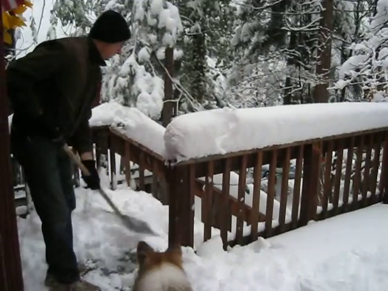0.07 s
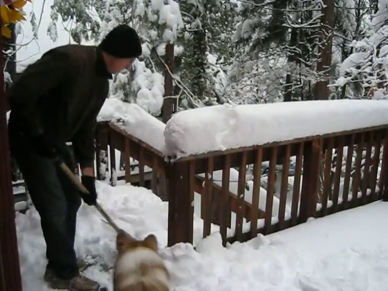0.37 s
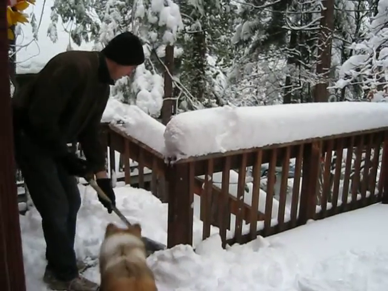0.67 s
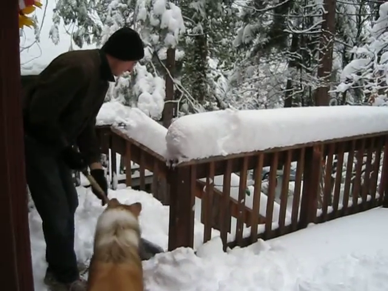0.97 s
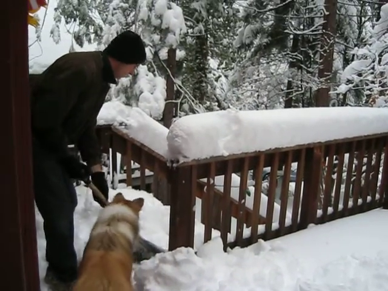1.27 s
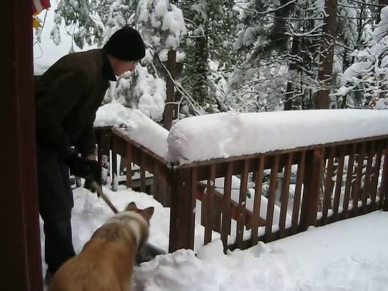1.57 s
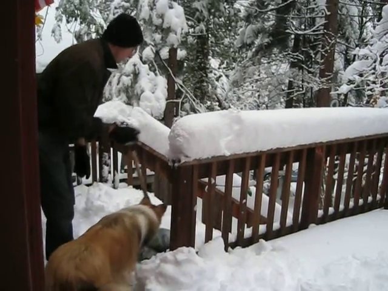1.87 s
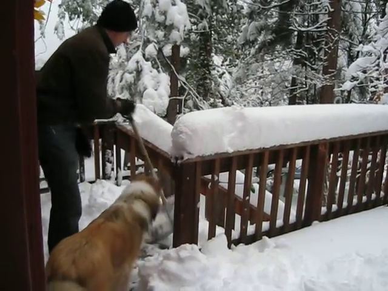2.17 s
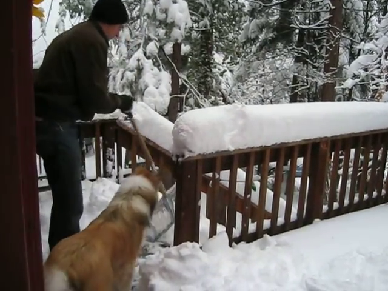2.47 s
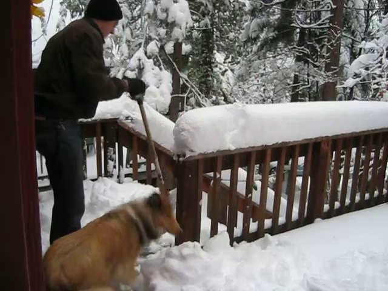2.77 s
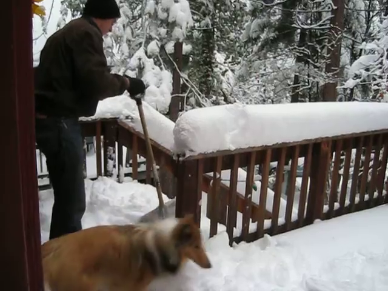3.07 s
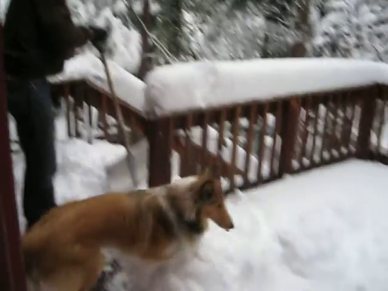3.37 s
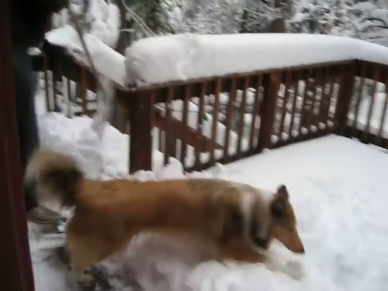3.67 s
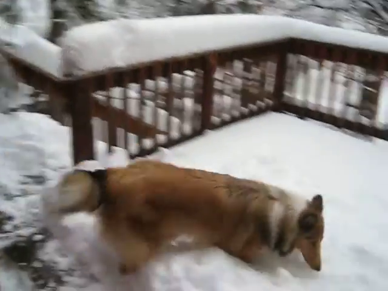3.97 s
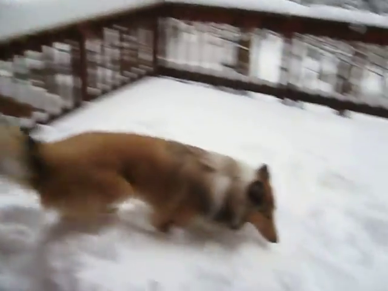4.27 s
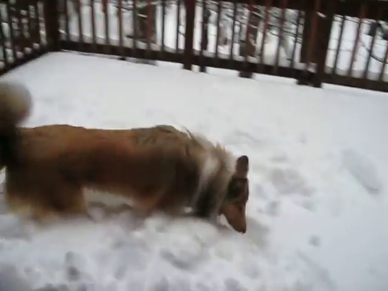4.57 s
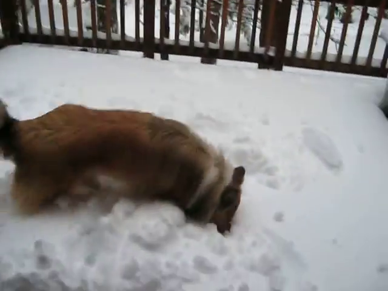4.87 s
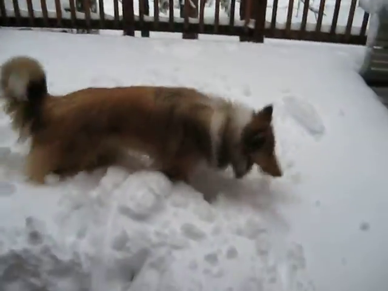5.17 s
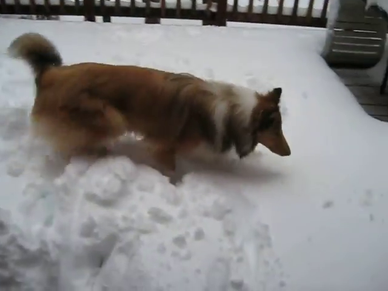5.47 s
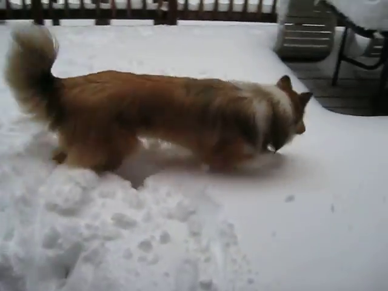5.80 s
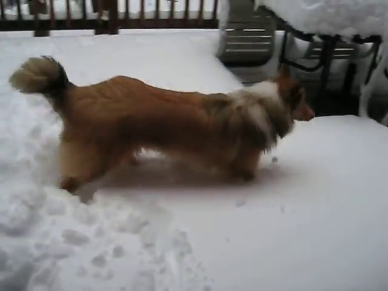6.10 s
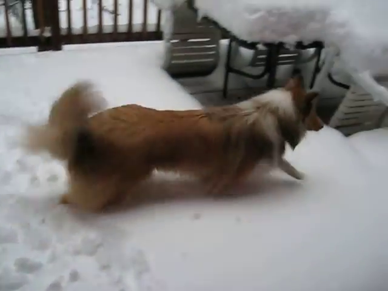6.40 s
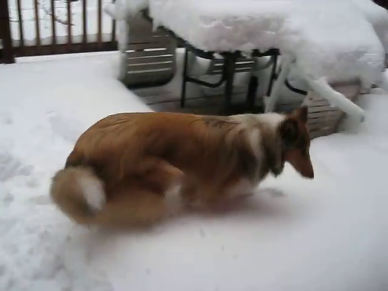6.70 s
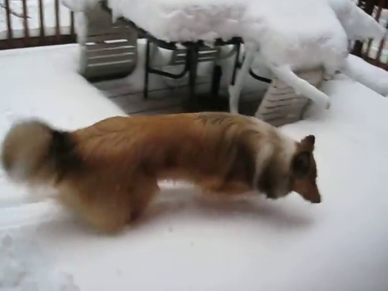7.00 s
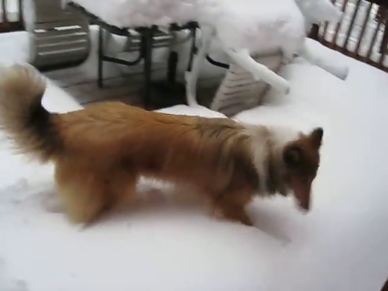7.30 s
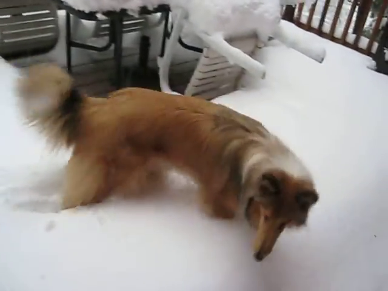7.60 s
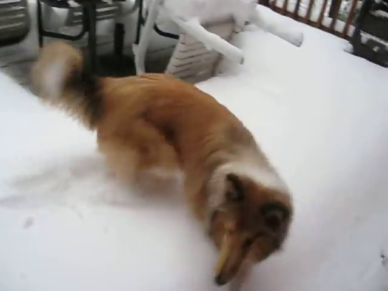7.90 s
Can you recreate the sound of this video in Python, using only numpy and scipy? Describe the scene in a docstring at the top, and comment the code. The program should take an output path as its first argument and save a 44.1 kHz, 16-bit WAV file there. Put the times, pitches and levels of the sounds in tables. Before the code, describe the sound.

Outdoors, over the faint hiss of a small microphone, a shovel swishes and rasps softly through snow, with little ticks and dull puffs as it packs. Two loud, sharp knocks of the blade on a wooden deck stand out, a brief scrape between them. Toward the end a dog wades through the snow with light crunches, and a few smaller knocks follow close together.

```python
"""A shovel bites and swishes through snow on a wooden deck outdoors. Stick-slip friction makes
its blade sing and rasp; crumbs of crust snap, and later its blows set the boards booming.
The snow crunches as its crystals fracture, and thuds dully where it is packed. In the second
half a dog wades about. A small camera microphone hears it all over a quiet, even hiss."""
import sys
import numpy as np
from scipy import signal
from scipy.fft import rfft, irfft, next_fast_len
from scipy.io import wavfile
from scipy.ndimage import map_coordinates

SR = 44100
rng = np.random.default_rng(int(sys.argv[2]) if len(sys.argv) > 2 else 0)


def dump_mix(stems):
    """Bounce the given channels to the path in sys.argv[1] as a 16-bit WAV at rate SR."""
    frames = np.atleast_2d(stems).T  # one column per channel
    limited = np.clip(frames, -1, 1)  # hard clip at full scale
    pcm = np.round(limited * 32767).astype(np.int16)
    wavfile.write(sys.argv[1], SR, pcm)


N = 354872


def amp(db):
    """Amplitude grows tenfold with every 20 decibels."""
    return 10 ** (np.asarray(db) / 20)


def unit(x):
    """Normalisation to rms 1."""
    return x / np.sqrt(np.mean(x ** 2) + 1e-20)


def along(points, hz):
    """Interpolation of (Hz, value) points on a logarithmic frequency axis."""
    f, v = np.transpose(points)
    return np.interp(np.log(hz + 1), np.log(f), v)


def filtered(x, response):
    """Linear filtering: the spectrum of x is multiplied by a frequency response."""
    size = next_fast_len(len(x) + 8192)
    return irfft(rfft(x, size) * response(np.fft.rfftfreq(size, 1 / SR)), size)[:len(x)]


def coloured(x, spectrum):
    """Spectral shaping by (Hz, relative dB) points; rms 1."""
    return unit(filtered(x, lambda hz: amp(along(spectrum, hz))))


def resonance(hz, centre_hz, q):
    """Causal band-pass response of a damped oscillator."""
    damping = 1j * hz * centre_hz / q
    return damping / (centre_hz ** 2 - hz ** 2 + damping)


def wobble(rate):
    """Smooth random modulation through rate knots a second."""
    return map_coordinates(rng.standard_normal(int(N * rate / SR) + 4), [np.arange(N) * rate / SR])


def add(track, start, sound):
    """Superposition: a sound joins the track at start seconds."""
    part = track[max(round(start * SR), 0):][:len(sound)]
    part += sound[:len(part)]


def swell(peak, rise, fall):
    """Envelope of a force that builds to a peak and lets go."""
    t = np.arange(N) / SR - peak
    return np.exp(-np.abs(t / np.where(t < 0, rise, fall)) ** 1.5)  # power 1 is pointed, 2 rounded


def friction(size, centre_hz, width_hz):
    """Stick-slip friction: random excitation heard through one resonance; rms 1."""
    noise = rng.standard_normal(size)
    return unit(filtered(noise, lambda hz: resonance(hz, centre_hz, centre_hz / width_hz) ** 2))


def contact(t, pitch_hz):
    """Impact transient: a hard touch swells and dies in about two cycles."""
    age = t * pitch_hz / .9
    return np.sin(2 * np.pi * pitch_hz * t) * (age * np.exp(1 - age)) ** 3.9


def crunch(spectrum, rate, spread_db, smooth_db, clump_db):
    """Brittle fracture: rate crystals break a second, louder in clumps, over smooth rubbing; rms 1."""
    breaks = (rng.random(N) < rate / SR) * rng.choice([-1, 1], N)
    sizes = amp(spread_db * np.minimum(rng.exponential(size=N), 4))
    grains = unit(breaks * sizes) + amp(smooth_db) * rng.standard_normal(N)
    return coloured(grains * amp(clump_db * wobble(140)), spectrum)


def snow(rub, spray, load):
    """Granular noise follows force: snow rubs, sprays powder with a few coarse crystals, and packs."""
    # Spectra of rubbing, powder and packing. Each row: frequency in Hz, relative level in dB.
    slide_spectrum = [(290, -68), (500, -17), (893, -14.5), (1190, -0.5), (2080, -1.5), (2530, 0.5),
                      (5160, -3.5), (6410, -6), (7880, -11), (9000, -7.5), (11700, -40), (19800, -120)]
    powder_spectrum = [(3000, -22), (6000, 0), (9500, 2), (13500, -1), (16000, -9.5)]
    packing_spectrum = [(30, -16), (80, -2.5), (200, 1.5), (400, 1.5), (680, 3.5), (1200, -1.5),
                        (2200, -6.5), (5000, -57)]
    slide = crunch(slide_spectrum, rate=2500, spread_db=1.5, smooth_db=0.5, clump_db=1.87)
    powder = crunch(powder_spectrum, rate=4000, spread_db=1, smooth_db=-5, clump_db=1.5)
    crystals = crunch(powder_spectrum, rate=100, spread_db=3.5, smooth_db=-30, clump_db=4.0)
    packing = crunch(packing_spectrum, rate=1100, spread_db=2.0, smooth_db=-1.0, clump_db=3.5)
    return rub * slide + spray * (powder + amp(-8) * crystals) + load * packing


def air():
    """Noise floor: still winter air and microphone hiss at a nearly constant level."""
    # Spectrum of the hiss. Each row: frequency in Hz, relative level in dB.
    spectrum = [(12, -39), (20, -3.5), (150, 3), (780, -1), (1910, -5.5), (3070, -8), (6010, -14),
                (7110, -15.5), (7950, -12), (8650, -16), (9950, -15), (14700, -20), (16000, -16)]
    level_db = -53.5 + 0.39 * wobble(3.6)
    return amp(level_db) * coloured(rng.standard_normal(N), spectrum)


def settling():
    """Granular flow: loose snow trickles faintly in uneven spurts."""
    # Course of the trickle. Each row: time in seconds, mean rubbing level in dB.
    trickle = [(0, -59.5), (1.3, -65), (3.2, -64.5), (3.6, -59), (4.9, -59), (6.7, -62), (7.4, -58.5),
               (8.05, -65)]
    times, db = np.transpose(trickle)
    flow = amp(np.interp(np.arange(N) / SR, times, db) + 3 * wobble(19))
    return snow(rub=flow, spray=amp(-6.5) * flow, load=amp(-4.5) * flow)


def squeak():
    """Frequency modulation: a faint, very high whistle wavers, holds and then sags."""
    # Each row: time in seconds, pitch in Hz, level in dB.
    times, hz, db = np.transpose([(5.305, 13400, -90), (5.32, 13400, -59), (5.38, 13550, -59),
                                  (5.415, 12550, -61), (5.445, 12950, -62), (5.47, 12400, -90)])
    t = np.arange(N) / SR
    pitch = np.interp(t, times, hz) * (1 + 0.0064 * wobble(400))
    envelope = amp(np.interp(t, times, db)) * (t > times[0]) * (t < times[-1])
    return envelope * np.sin(2 * np.pi * np.cumsum(pitch) / SR)


def tread():
    """Friction and loading: the dog's legs brush the snow; its weight packs it and shakes the deck."""
    # The dog's steps. Each row: peak time and rise or fall time in seconds, level in dB,
    # powder and weight in relative dB.
    steps = [(5.416, .1, -57, -6, 4), (5.874, 0.16, -55.5, -11, -9), (6.473, 0.14, -56, -8, 1),
             (6.662, 0.098, -55, -5, 2.5), (6.87, 0.11, -63, -1, 11), (7.103, 0.073, -59.5, -16, 14.5),
             (7.169, 0.02, -52.5, -1, 4.5), (7.226, 0.028, -50.5, -9, -2), (7.287, 0.04, -59.5, -23, 15),
             (7.456, .013, -46.5, -17, -9), (7.533, 0.055, -47.5, -11, -6.5), (7.602, 0.035, -50, -9, 0),
             (7.738, 0.018, -49.5, -19, -9), (7.883, 0.055, -52, -5.5, 1), (7.987, 0.059, -52, -4.5, 3.5)]
    # Spectrum of the boards under the dog. Each row: frequency in Hz, relative level in dB.
    rumble_spectrum = [(20, -14), (35, -7), (90, 0), (150, -3), (260, 1.5), (600, -53)]
    rub, spray, load = np.zeros((3, N))
    for peak, ramp, db, powder_db, weight_db in steps:
        force = amp(db) * swell(peak, ramp, ramp)
        rub += force
        spray += amp(powder_db) * force
        load += amp(weight_db) * force
    rumble = amp(-7) * load * coloured(rng.standard_normal(N), rumble_spectrum)
    return snow(rub, spray, load) + rumble


def thuds():
    """Heavy damping: packed snow gives way with a soft puff in one broad resonance. The thuds at 0.414 and
    1.703 s are instead short hollow knocks of the blade, played the same way."""
    # Each row: start in seconds, peak level in dB, pitch in Hz.
    collapses = [(.414, -30.5, 437), (0.678, -37, 443), (1.703, -35.5, 514), (1.969, -39, 402),
                 (3.002, -43, 796), (6.831, -39, 630), (7.177, -38, 689), (7.546, -33.5, 1120),
                 (7.632, -39, 296), (7.836, -33.5, 415), (7.966, -40.5, 177)]
    out, t = np.zeros(N), np.arange(SR // 10) / SR
    for start, db, pitch_hz in collapses:
        puff = filtered(rng.standard_normal(len(t)), lambda hz: resonance(hz, pitch_hz, q=1.3) ** 2)
        puff *= (1 - np.exp(-t / 0.0017)) * amp(-60 * t / 0.045)
        add(out, start, amp(db) * puff / np.abs(puff).max())
    return out


def ticks():
    """Brittle fracture: a hard crumb of crust snaps and throws fine splinters. The snaps at 2.2805 and 7.1368 s
    are instead the sharp clicks that open a bite of the blade and a blow on the boards."""
    # Each row: start in seconds, level in dB, pitch in Hz, splinters in relative dB.
    snaps = [(1.384, -45.5, 4000, 3.5), (1.968, -39.5, 1190, -5), (2.2805, -25, 4200, -10),
             (2.472, -38.5, 800, -12), (3.073, -38, 1530, 0), (3.617, -50, 2500, 7.5),
             (3.724, -45, 2400, 5.5), (3.756, -39, 1200, -4), (4.181, -40.5, 1200, -0.5),
             (4.227, -30, 6000, -11), (4.8215, -27, 3600, -27.5), (6.501, -33.5, 1060, -21),
             (6.881, -36, 760, -21), (7.1368, -28, 2130, -28), (7.605, -31.5, 1490, -16)]
    # Each row: frequency in Hz, relative level in dB.
    splinter_spectrum = [(60, -30), (400, -7), (2000, 8), (5000, 2.5), (12000, -2)]
    out, t = np.zeros(N), np.arange(SR // 20) / SR
    envelope = (1 - np.exp(-t / 0.00017)) * amp(-60 * t / 0.039)
    for start, db, pitch_hz, splinter_db in snaps:
        splinters = coloured(rng.standard_normal(len(t)), splinter_spectrum) * envelope
        add(out, start, amp(db) * (contact(t, pitch_hz) + amp(splinter_db) * splinters))
    return out


def scattering(t, ring_hz, t60):
    """Diffuse reflection from rails and walls: a ringing tail whose treble dies first."""
    # Reverberation of the yard. Each row: frequency in Hz, time to fall 60 dB in seconds.
    yard = [(100, 1), (1000, 1), (3000, 1), (12000, .1)]
    bands, times, spectra = signal.stft(rng.standard_normal(len(t)), SR, nperseg=128)
    decay = amp(-60 * times / along(yard, bands)[:, None])
    diffuse = signal.istft(spectra * decay, SR, nperseg=128)[1][:len(t)]
    tail = filtered(diffuse, lambda hz: resonance(hz, ring_hz, q=7.2) / (1 + (hz / 3200) ** 2))
    return tail / np.std(tail[:SR // 40]) * amp(-60 * t / t60)  # a fade on top of the yard's decay


def boards(t, boom_hz):
    """Modal vibration: where a blow lands decides which modes boom most, here those near boom_hz."""
    # Modes of the deck. Each row: frequency in Hz, relative level in dB, time to fall 60 dB in seconds.
    modes = [(97, 6, 0.12), (122, -5, 0.2), (141, -6.5, 0.25), (190, -1.5, 0.072), (226.3, 1, 0.26),
             (296, -5.5, 0.36), (427, 2.5, 0.13), (506, -24, 0.23), (608, 9, 0.23)]
    boom = np.zeros(len(t))
    for hz, db, t60 in modes:
        octaves_off = abs(np.log2(hz / boom_hz))
        envelope = amp(db - 16.7 * octaves_off - 60 * t / t60)
        boom += envelope * np.sin(2 * np.pi * (hz * t + rng.random()))
    return boom


def knocks():
    """Impact excitation: the blade clacks, rebounds and echoes; the boards boom, the rails scatter."""
    # Blows on the boards. Each row: start in seconds, level in dB, contact and ring pitches in Hz,
    # tail in relative dB, its 60 dB fade in seconds, boom centre in Hz, boom and crack in relative dB.
    blows = [(3.978, -9, 1390, 670, -11, 0.13, 143, -10, -11.5),
             (3.9865, -20, 670, 190, -9, 0.24, 170, -6, -17),
             (4.005, -25, 2170, 700, -3, 0.18, 159, 2, -2.5),
             (4.049, -27.5, 710, 690, 3, 0.081, 140, 5, -6),
             (5.196, -26.5, 830, 573, -8, 0.041, 350, -12, -7.5),
             (5.528, -28, 815, 617, 0.5, 0.11, 110, -5, -18),
             (5.7037, -6.5, 1073, 976, -18.5, 0.29, 386, -14.5, -25.5),
             (5.7112, -28, 364, 643, -1, 0.21, 88.5, 10.5, -22),
             (7.1357, -20, 915, 437, -4, 0.056, 300, -14, -25),
             (7.2247, -24.5, 1100, 725, 6.5, 0.039, 437, -4.5, -15),
             (7.2601, -28, 294, 300, -10, 0.06, 228, -5, -16),
             (7.276, -27.5, 825, 460, -9, 0.14, 260, -8, -6)]
    # Reflections from the house wall and rails. Each row: delay in seconds, gain in dB.
    echoes = [(0.0102, -14.5), (0.0235, -22), (.032, -33)]
    # Each row: frequency in Hz, relative level in dB.
    crack_spectrum = [(60, -35), (250, 8), (700, 8), (2600, 1), (5000, -16.5), (14000, -16.5)]
    rebound_cycles = 1.993  # a harder, higher contact rebounds sooner
    out, t = np.zeros(N), np.arange(SR // 2) / SR
    crack_envelope = (1 - np.exp(-t / 0.00035)) * amp(-60 * t / 0.06)
    body_onset = 1 - np.exp(-(t / 0.0051) ** 2)
    for start, db, contact_hz, ring_hz, tail_db, t60, boom_hz, boom_db, crack_db in blows:
        for delay, gain_db in [(0, 0), (rebound_cycles / contact_hz, -4)] + echoes:
            add(out, start + delay, amp(db + gain_db) * contact(t, contact_hz))
        crack = amp(crack_db) * coloured(rng.standard_normal(len(t)), crack_spectrum) * crack_envelope
        boom = amp(boom_db - 11.5) * boards(t, boom_hz)
        tail = amp(tail_db - 4.5) * scattering(t, ring_hz, t60)
        add(out, start, amp(db) * (crack + (boom + tail) * body_onset))
    return out


def rasps():
    """Stick-slip excitation: the blade catches and one of its resonances sounds for a moment. The low catches
    at 0.567 and 1.177 s are groans of packing snow."""
    # Each row: start and end in seconds, centre and bandwidth in Hz, level in dB.
    catches = [(0.376, 0.452, 6700, 220, -59), (0.485, 0.6, 3280, 700, -43.5),
               (0.567, 0.62, 837, 203.7, -40.5), (1.177, 1.226, 650, 150, -44),
               (3.976, 3.988, 4370, 500, -39), (4.819, 4.827, 2700, 300, -43),
               (5.124, 5.193, 5540, 2160, -37.5), (5.109, 5.177, 2600, 756, -44),
               (6.321, 6.355, 2300, 432, -42.5), (6.36, 6.88, 2420, 216, -62.5),
               (7.49, 7.568, 1270, 509.3, -48)]
    out = np.zeros(N)
    for start, end, centre_hz, width_hz, db in catches:
        size = round((end - start) * SR)
        add(out, start, amp(db) * friction(size, centre_hz, width_hz) * signal.windows.tukey(size, .5))
    return out


def bites():
    """Forced vibration: a stab starts at once, holds while the blade sinks, and rings its edge."""
    # Each row: start in seconds, level in dB, hold in seconds, powder and packing in relative dB.
    stabs = [(0.014, -54.5, 0.02, 6.5, -24), (0.3, -52, 0.013, -4, -5), (0.369, -38, 0.0081, -12, -10.5),
             (0.412, -40, 0.02, -7, -9), (1.121, -46, 0.019, 1, -1.5), (1.378, -53.5, 0.0047, 5, 2.5),
             (2.284, -51.5, 0.015, 0, 2.5), (2.828, -54.5, 0.018, -13, 5.5), (3.281, -50, .016, 4, -13)]
    rub, spray, load = np.zeros((3, N))
    t = np.arange(SR // 4) / SR
    for start, db, hold, powder_db, packing_db in stabs:
        force = amp(db) * (1 - np.exp(-t / .0005)) * np.exp(-np.maximum(t - hold, 0) / .008)
        add(rub, start, force)
        add(spray, start, amp(powder_db) * force)
        add(load, start, amp(packing_db) * force)
    return snow(rub, spray, load) + amp(-1) * rub * friction(N, centre_hz=4380, width_hz=2000)


def pushes_and_steps():
    """Sliding friction: each push makes the blade's modes sing; the load ahead packs and groans. Two rows, at
    4.33 and 4.735 s, are steps of the dog, played the same way."""
    # Each row: peak, rise and fall times in seconds, level in dB, powder and packing in relative dB. The rows
    # at 4.33 and 4.735 s are the dog's steps.
    pushes = [(.092, .028, 0.017, -41.5, 0, -23), (.54, 0.052, .075, -37.5, -10, -10.5),
              (.665, 0.052, 0.044, -46, -11, -2), (.772, 0.021, 0.021, -46, -3, -15),
              (.87, 0.069, 0.084, -53, -7, -16), (1.19, 0.06, .035, -43.5, -7, -4),
              (1.465, 0.053, 0.039, -52, -7, -7), (1.53, 0.026, 0.043, -50.5, -3.5, -8),
              (1.65, 0.033, 0.028, -44, -10, -2.5), (1.705, 0.026, 0.052, -47, -8, -3),
              (1.9, 0.037, 0.086, -53.5, -9, -2.5), (2.005, 0.035, 0.17, -53, 1, -10.5),
              (2.245, 0.08, 0.051, -49.5, -1, -3.5), (2.42, 0.022, 0.098, -64.5, 4.5, -15),
              (2.76, 0.13, 0.14, -60, 4.5, -21), (3.35, 0.07, 0.045, -53, -1, -18),
              (3.55, 0.15, 0.046, -55, -8, -2), (3.72, 0.1, 0.048, -55.5, -1.5, -17.5),
              (3.98, 0.14, 0.15, -52.5, -5, 2), (4.215, 0.097, 0.021, -59.5, 3, -1),
              (4.33, 0.024, 0.17, -64.5, 7.5, -5), (4.735, 0.056, 0.043, -53, -1, -16),
              (5.158, 0.039, 0.03, -30.5, -6, -22), (6.29, 0.11, 0.069, -42.5, -6.5, -9),
              (6.338, 0.02, 0.025, -45, -18, -6)]
    # Each row: frequency and bandwidth in Hz, relative level in dB.
    blade_modes = [(2520, 210, -18), (3415, 430, -14), (4160, 500, -15), (5300, 680, -18),
                   (6400, 210, -17.5)]
    load_lag_s = 0.016  # the load packs a moment after the blade slides
    rub, spray, load = np.zeros((3, N))
    for peak, rise, fall, db, powder_db, packing_db in pushes:
        force = amp(db) * swell(peak, rise, fall)
        rub += force
        spray += amp(powder_db) * force
        add(load, load_lag_s, amp(packing_db) * force)
    singing = sum(amp(db) * friction(N, hz, width_hz) for hz, width_hz, db in blade_modes)
    groan = amp(-6) * friction(N, centre_hz=730, width_hz=240)
    return snow(amp(-1) * rub, spray, load) + rub * singing + load * groan


def scene():
    """Superposition of everything on the deck, in mono."""
    blade = pushes_and_steps() + bites() + rasps() + knocks()
    return (blade + ticks() + thuds() + tread() + settling() + squeak() + air())[None]


def record(dry):
    """Frequency response of the camera: a deep notch in the treble and a steep band limit."""
    notch_hz, top_hz = 7920, 15900
    return np.array([filtered(x, lambda hz: (1 - resonance(hz, notch_hz, q=3.22)) * (hz < top_hz))
                     for x in dry])


dry = scene()
out = record(dry)
dump_mix(out)
```